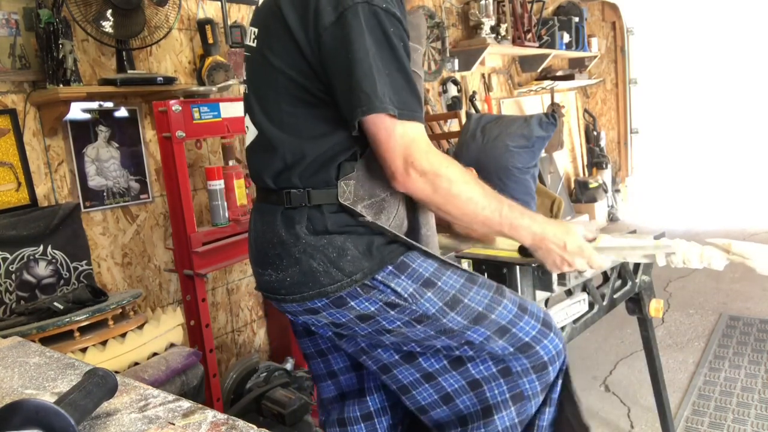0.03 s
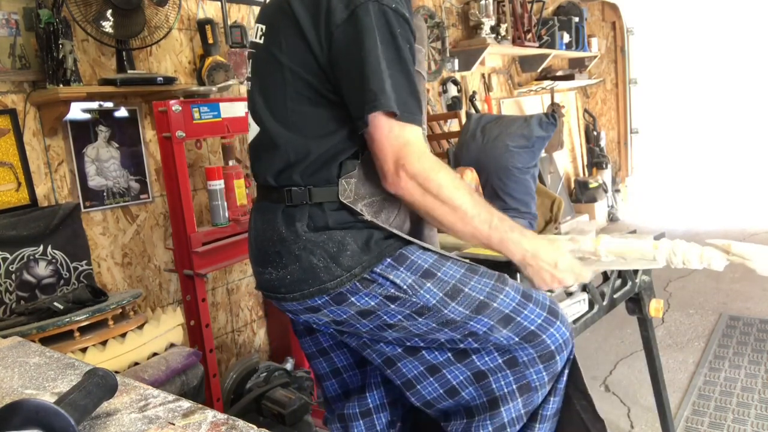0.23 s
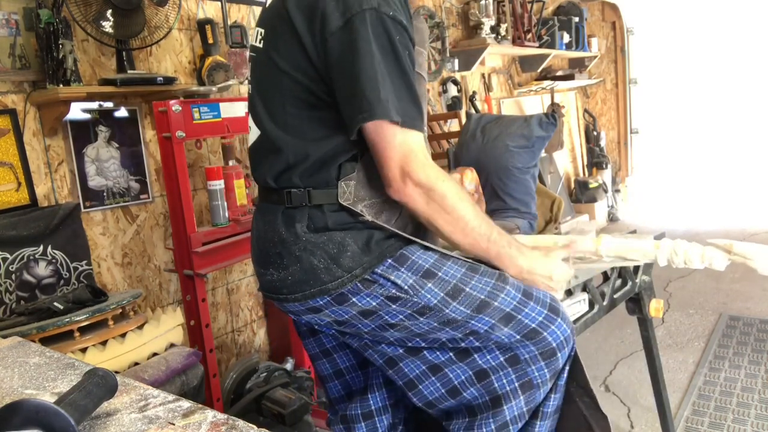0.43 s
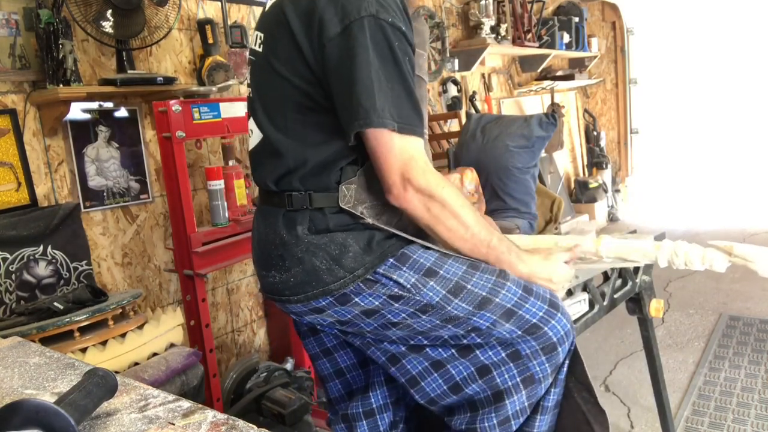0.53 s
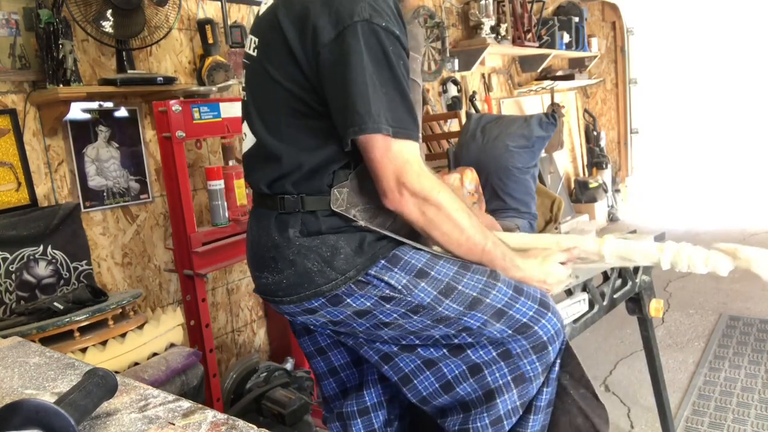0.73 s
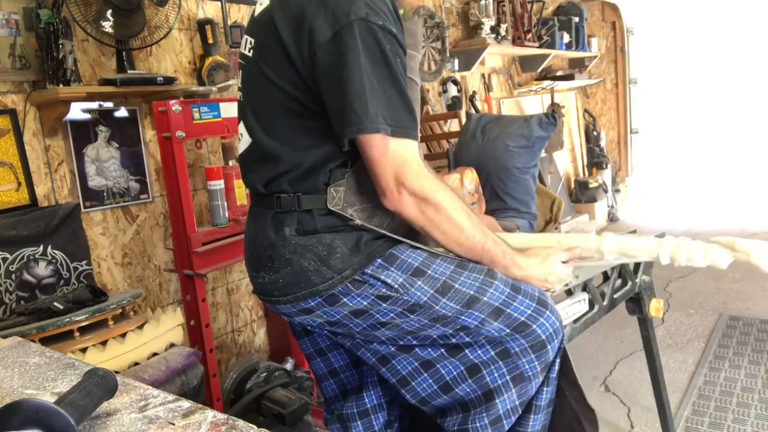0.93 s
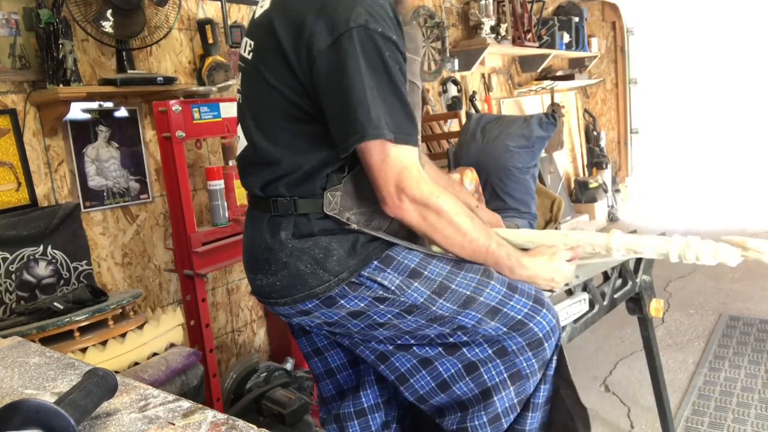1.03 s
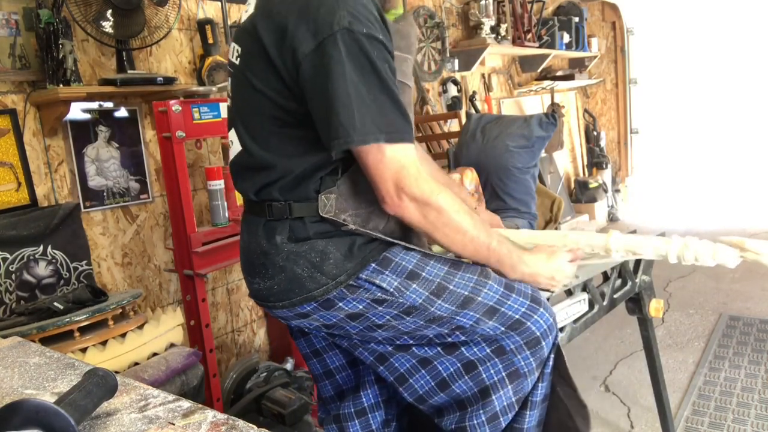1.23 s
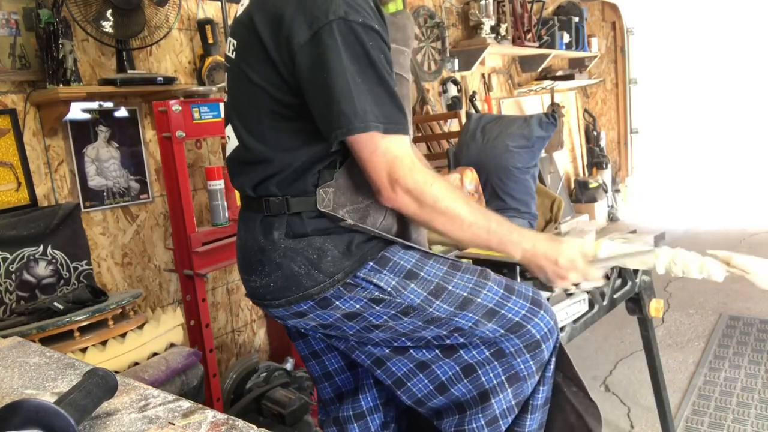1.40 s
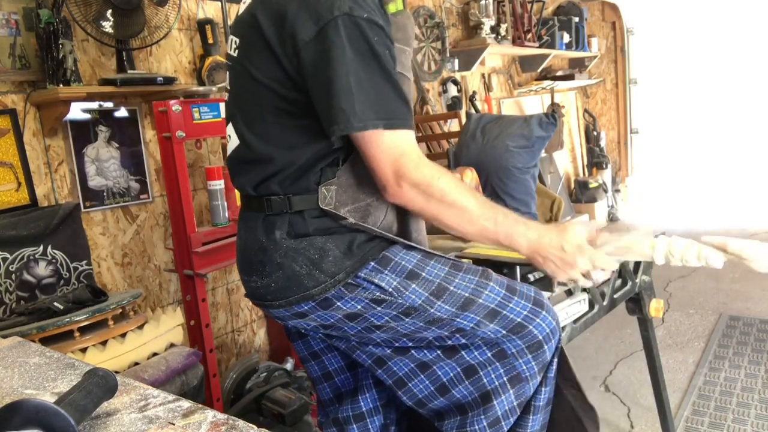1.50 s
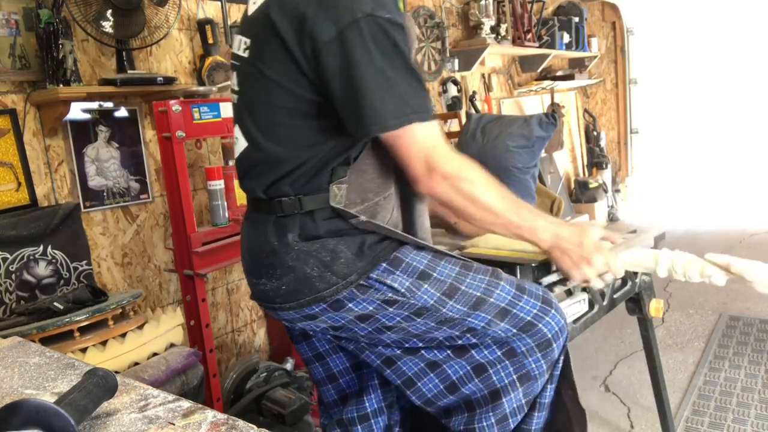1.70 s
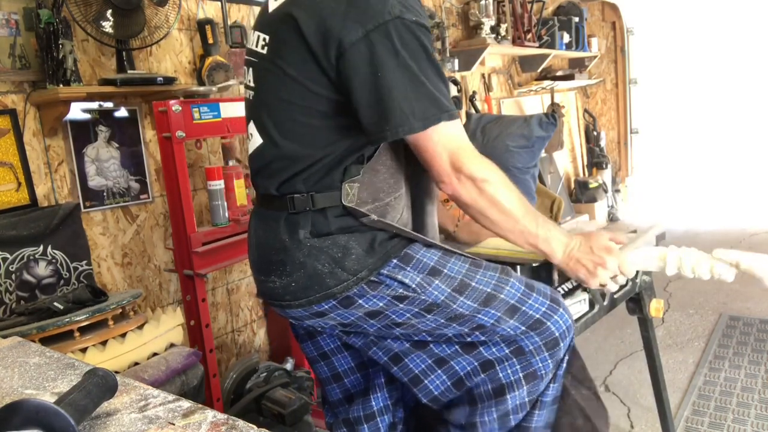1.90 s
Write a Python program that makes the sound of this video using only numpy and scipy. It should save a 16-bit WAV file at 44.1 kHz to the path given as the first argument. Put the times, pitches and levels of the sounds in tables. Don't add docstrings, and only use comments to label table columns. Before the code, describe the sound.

Sharp metallic clack of a clamp closing on wood, then faint clicks, rubbing and low rumble.

```python
import sys
import numpy as np
from scipy import signal
from scipy.fft import rfft, irfft
from scipy.io import wavfile
from scipy.ndimage import uniform_filter1d

SR = 44100
rng = np.random.default_rng(int(sys.argv[2]) if len(sys.argv) > 2 else 0)


def to_wav(sig):
    pcm = np.clip(np.atleast_2d(sig), -1, 1) * 32767
    pcm = np.round(pcm).astype(np.int16)
    wavfile.write(sys.argv[1], SR, pcm.T)


def linear_from_db(decibels):
    return 10 ** (np.asarray(decibels, float) / 20)


N = 85995

# start_s, level_db, pitch_hz, burst_ms, ring_db
SNAPS = [(.2003, -18, 6200, 0.82, -5.5), (.2024, -17, 4260, 2.5, -8), (.2068, -22.5, 4140, 0.66, -4),
         (.2110, -31.5, 1680, 2.54, -2.5), (.2396, -40, 3800, 1.5, 2), (0.2444, -21, 4050, 1.3, -9),
         (.2590, -25, 3940, 1.8, -8), (.2760, -30.5, 3480, 1.25, -10), (.3560, -47, 2160, 3.06, -22),
         (1.0744, -29, 3480, 0.497, -17.5), (1.6750, -48, 4560, 2.4, -10), (1.8213, -43.5, 6130, .6, -3.5)]
# pitch_hz, level_db, t60_s
STEEL_MODES = [(813, -10.5, 0.29), (1343, -8, 0.4), (1600, -1.5, 0.17), (2260, -7, 0.18), (2740, -6, 0.08),
               (3440, -0.5, .07), (3650, -4, 0.072), (3770, -5, 0.1), (3820, -3.5, 0.11), (4290, 2, 0.072),
               (4197, -4, 0.079), (5596, -5.5, 0.056), (6670, -13, 0.11), (7480, 0.5, 0.04)]
# pitch_hz, width_hz, level_db
CHATTER_BANDS = [(1600, 1970, -1.5), (2300, 1100, -4.5), (3600, 1300, -1), (5460, 990, -3.5),
                 (7600, 1500, -6), (12500, 2600, -13.5)]
# start_s, pitch_hz, level_db, t60_s
PIN = (1.8215, 11500, -47, .018)
# start_s, level_db, pitch_hz, contact_ms, thud_db
KNOCKS = [(0.0911, -42, 724, 8, -19), (0.163, -44.5, 1000, 6.4, -3), (.2520, -40, 760, 7.5, -42),
          (.4480, -48.5, 1000, 7.5, -45), (0.5221, -35.5, 760, 5, -14), (.7450, -54.5, 950, 13.3, -25),
          (1.4100, -41, 600, 9, -24), (1.439, -49, 1080, 5.1, 1), (1.5325, -43, 950, 11.7, -13),
          (1.6745, -38, 1160, 1.2, 3), (1.6970, -51, 790, 2.5, 6), (1.748, -45.5, 1350, 7.5, -21),
          (1.7720, -41, 1160, 9.2, -16), (.0020, -47, 603, 7.1, -5.5), (.2800, -38, 812, 16, -28),
          (1.4150, -43, 1150, 14.6, -30)]
# pitch_hz, level_db, t60_s
WOOD_MODES = [(617, -1, 0.21), (705.5, -5.5, 0.13), (812, -3.5, 0.086), (937, -11, 0.05), (1016, -8, .06),
              (1154, -4.5, 0.042), (1256, 2, 0.046), (1690, -2, 0.046), (2650, -12, 0.03),
              (2310, -22, 0.018), (3000, -7, 0.039)]
# pitch_hz, level_db, t60_s
THUD_MODES = [(290, -2, 0.06), (359, 0, 0.092), (489, 0.5, 0.048)]
# start_s, pitch_hz, level_db, rise_ms, t60_s
RINGS = [(.256, 705, -43, 5, 0.18), (.280, 812, -42, 11, .24), (.290, 1690, -49, 6, .12),
         (.331, 1338, -48, 4, .2), (.352, 2256, -50, 4, .08), (.397, 2256, -59, 4, .1),
         (.298, 3400, -50, 4, .1), (.449, 935, -50, 3, .12), (.449, 1270, -52, 3, .07),
         (.523, 1685, -48, 2, 0.053), (.550, 900, -56, 5, 0.11), (.565, 720, -53, 5, .1),
         (.260, 4270, -36, 2, .07), (0.21, 3800, -40, 2, .07), (0.31, 3500, -40, 1.7, 0.055),
         (.288, 4000, -47, 1.5, 0.033), (1.381, 3800, -57.5, 3, 0.093), (1.410, 1004, -47.5, 2, .08),
         (1.412, 1685, -52, 2, 0.078), (1.318, 614, -59, 12, 0.33), (1.4, 1330, -55, 2.7, 0.067),
         (1.0742, 1410, -44, 0.25, 0.015), (1.675, 900, -46, 1.9, 0.061), (.745, 1000, -54, 8, 0.17),
         (1.397, 1300, -50, 3, .05), (.093, 1150, -50, 1.8, 0.075), (.165, 340, -53, 4, .08),
         (1.411, 614, -46, 3, .18), (1.675, 3100, -52, .6, .02), (1.768, 3000, -52, .8, .015),
         (1.770, 4500, -54, .6, .012), (1.774, 1150, -48, 2, .05), (1.535, 2400, -54, 1, .03),
         (1.818, 1300, -53, 3, .06), (1.870, 450, -52, 4, .06), (.2005, 3440, -27, .8, .03),
         (.2005, 5750, -30, .5, .03), (.2025, 2500, -32, 1, .03), (.5228, 614, -36, 1.5, .06)]
# start_s, level_db, pitch_hz, rise_ms, fall_ms
SCUFFS = [(.004, -51, 1500, 4.5, 30), (0.044, -61, 2000, 1.9, 11), (0.09, -54, 2240, 2, 20),
          (0.099, -62, 12500, 16, 16), (0.199, -47, 3000, 5, 4.0), (0.265, -36.5, 3800, 12.6, 27.4),
          (.545, -62, 3470, 14, 25.0), (1.200, -65.5, 4000, 43, 49), (1.385, -63, 3800, 6.9, 12),
          (1.404, -51.5, 2200, 8.5, 12.5), (1.420, -62.5, 6600, 14, 23), (1.420, -70, 13300, 9.6, 20),
          (1.537, -62, 1600, 1.7, 26), (1.570, -64, 2650, 4.6, 13), (1.599, -62, 1360, 4.0, 12.0),
          (1.770, -54.5, 3000, 3.5, 6.7), (1.797, -57.5, 2860, 5.3, 40), (1.835, -60, 2700, 10.0, 25),
          (.228, -41, 2400, 12, 20), (.225, -45, 6800, 10, 20), (.262, -43, 1700, 15, 35),
          (1.758, -56, 1600, 8, 15), (1.793, -56, 900, 4, 12), (1.418, -57, 2400, 5, 20),
          (1.830, -71, 13500, 36, 21)]
# time_s, level_db
SLIDE_PRESSURE = [(0, -62.5), (.19, -62.5), (.36, -61.5), (.5, -65), (.63, -72.5), (.72, -64.5), (.82, -59),
                  (.93, -62.5), (1.02, -69), (1.12, -62), (1.27, -77.5), (1.37, -62), (1.5, -66.5),
                  (1.64, -79.5), (1.75, -64.5), (1.86, -63.5), (1.95, -70)]
# pitch_hz, width_hz, level_db
SLIDE_BANDS = [(874, 900, 3), (1500, 940, -2.5), (2497, 120, -2), (2900, 480, 1.5), (3800, 970, 2),
               (4490, 104, -5), (6320, 1600, -4), (11500, 4500, -10.5)]
# pitch_hz, t60_s, level_db
ROOM_DECAY = [(264, 0.62, -2.5), (480, 0.53, -6.5), (1000, 0.33, -1), (2000, 0.3, 0), (4000, 0.19, -4),
              (8540, 0.24, -4.5), (14400, 0.19, 3)]
# pitch_hz, width_hz, level_db
RUMBLE_MODES = [(56.4, 23, -0.5), (71, 18.7, -2), (85.3, 18.3, -0.5), (100.3, 8.5, 1.5), (121.6, 25.5, -5),
                (169, 30, -9)]
# time_s, level_db
RUMBLE_SWELL = [(0.0, -54), (0.064, -48), (0.19, -56), (0.21, -47.5), (0.282, -58.5), (0.304, -51.5),
                (0.58, -46.5), (0.624, -57), (0.65, -47), (0.912, -52.5), (0.938, -43.5), (1.036, -56.5),
                (1.08, -46), (1.238, -50.5), (1.466, -45), (1.492, -56), (1.52, -46), (1.95, -52)]
# pitch_hz, level_db (per Hz)
HISS_SPECTRUM = [(150, -10.5), (231, -4.5), (700, -14.5), (1500, -15.5), (4500, -30), (6000, -26),
                 (9000, -33), (14000, -34)]
# pitch_hz, width_hz, depth (0-1)
MIC_DIP = (10300, 420, 0.37)

HIT_SPREAD_DB = 1.5


def unit(x):
    return x / np.sqrt(np.mean(x ** 2))


def band(x, hz, width):
    return signal.lfilter(*signal.iirpeak(hz, hz / width, SR), x)


def steep(x, hz, width):
    return band(band(x, hz, width), hz, width)


def decay(t, t60):
    return 1000. ** (-t / t60)


def add(out, x, s):
    i = int(s * SR)
    x = x[:N - i]
    out[i:i + len(x)] += x


def curve(table):
    time_s, level_db = np.transpose(table)
    return np.interp(np.arange(N) / SR, time_s, level_db)


def ring(push, modes, colour):
    hz, db, t60 = np.array(modes).T[:, :, None]
    t = np.arange(int(.3 * SR)) / SR
    reach = np.abs(np.exp(-2j * np.pi * hz * t[:len(push)]) @ push)[:, None]
    reach = reach / np.sqrt(np.sum(push ** 2))
    gain = linear_from_db(db + colour[:, None]) / (0.075 + reach)
    body = gain * np.sin(2 * np.pi * hz * t) * decay(t, t60)
    return signal.fftconvolve(push, body.sum(axis=0))


def near(modes, hz, db_per_octave):
    return -db_per_octave * np.abs(np.log2(np.array(modes)[:, 0] / hz))


def spread(modes):
    return rng.standard_normal(len(modes))


def grit(count):
    caught = rng.random(count) < 1100 / SR
    size = linear_from_db(2.5 * np.minimum(rng.exponential(size=count), np.e))
    grains = caught * size * rng.standard_normal(count)
    return .5 * unit(grains) + rng.standard_normal(count)


def snaps():
    out, t, long = np.zeros(N), np.arange(600) / SR, np.arange(4000) / SR
    for s, db, hz, ms, ring_db in SNAPS:
        shape = t / (ms / 1000) * np.exp(1 - t / (ms / 3000)) * 3
        noise = steep(rng.standard_normal(600), hz, 1.01 * hz)
        burst = shape * (np.sin(2 * np.pi * hz * t) + 0.93 * noise)
        add(out, linear_from_db(db) * band(burst, hz, 3.2 * hz), s - ms / 2000)

        click = np.sign(rng.standard_normal(1))
        colour = near(STEEL_MODES, hz, 4.0) + HIT_SPREAD_DB * spread(STEEL_MODES)
        add(out, linear_from_db(db + ring_db - 10) * ring(click, STEEL_MODES, colour), s)

        shake = rng.standard_normal(4000) * np.exp(-long / 0.0133)
        chatter = sum(linear_from_db(g) * steep(shake, f, w) for f, w, g in CHATTER_BANDS)
        add(out, linear_from_db(db + ring_db) * chatter, s)
    return out


def pin():
    out, t = np.zeros(N), np.arange(4000) / SR
    s, hz, db, t60 = PIN
    tone = np.sin(2 * np.pi * hz * t) + 0.33 * np.sin(2.03 * np.pi * hz * t)
    add(out, linear_from_db(db) * tone * decay(t, t60), s)
    return out


def knocks():
    out, t = np.zeros(N), np.arange(2500) / SR

    def peak(x):
        return x / np.max(np.abs(x))

    for s, db, hz, ms, thud_db in KNOCKS:
        shape = np.exp(-t / (ms / 1000)) * np.minimum(t / (ms / 3000), 1)
        push = band(rng.standard_normal(2500), hz, 1.48 * hz) * shape
        colour = near(WOOD_MODES, hz, 10.0) + HIT_SPREAD_DB * spread(WOOD_MODES)
        add(out, linear_from_db(db) * peak(ring(push, WOOD_MODES, colour)), s)
        thud = ring(push, THUD_MODES, 2.0 * spread(THUD_MODES))
        add(out, linear_from_db(db + thud_db) * peak(thud), s)
        add(out, linear_from_db(db - 9.5) * peak(steep(push, hz, 0.51 * hz)), s)
    return out


def rings():
    out, t = np.zeros(N), np.arange(int(.3 * SR)) / SR
    pair_hz, pair_share = 27, .35
    for s, hz, db, rise_ms, t60 in RINGS:
        swell = 1 - np.exp(-(t / (rise_ms / 1000)) ** 2)
        pair = np.sin(2 * np.pi * hz * t) + pair_share * np.sin(2 * np.pi * (hz + pair_hz) * t)
        add(out, linear_from_db(db) * swell * decay(t, t60) * pair, s)
    return out


def scuffs():
    out, t = np.zeros(N), np.arange(N) / SR
    rub = grit(N)
    for s, db, hz, rise_ms, fall_ms in SCUFFS:
        part = slice(max(int((s - .1) * SR), 0), int((s + 0.14) * SR))
        d = t[part] - s
        rise = np.exp(-(d / (rise_ms / 1000)) ** 2)
        fall = np.exp(-np.abs(d) / (fall_ms / 1000))
        shape = np.where(d < 0, rise, fall)
        width = 0.79 * min(hz, 5500)
        coloured = band(band(rub[part], hz, width), hz, 1.6 * width)
        out[part] += linear_from_db(db) * shape * unit(coloured)
    return out


def slide():
    rub = grit(N)
    coloured = sum(linear_from_db(db) * unit(steep(rub, hz, w)) for hz, w, db in SLIDE_BANDS)
    return unit(coloured) * linear_from_db(curve(SLIDE_PRESSURE) + 1)


def garage(x):
    t = np.arange(int(.6 * SR)) / SR
    tail = np.zeros(len(t))
    for hz, t60, db in ROOM_DECAY:
        octave = unit(band(rng.standard_normal(len(t)), hz, 0.54 * hz))
        tail += linear_from_db(db) * np.sqrt(hz) * octave * decay(t, t60)
    tail = tail * np.clip(t / 0.0032 - .5, 0, 1)
    tail = tail / np.sqrt(np.sum(tail ** 2))
    return x + linear_from_db(-5) * signal.fftconvolve(x, tail)[:N]


def rumble():
    low = np.zeros(N)
    for hz, w, db in RUMBLE_MODES:
        mode = steep(rng.standard_normal(2 * N), hz, w)[N:]
        low += linear_from_db(db) * unit(mode)
    slow = np.sqrt(uniform_filter1d(uniform_filter1d(low ** 2, 3000), 3000))
    return unit(low / slow ** 0.31) * linear_from_db(curve(RUMBLE_SWELL))


def hiss():
    f = np.maximum(np.arange(N // 2 + 1) * SR / N, 1)
    hz, level_db = np.transpose(HISS_SPECTRUM)
    db = np.interp(np.log(f), np.log(hz), level_db)
    db = db - 20 * np.log10(1 + (90 / f) ** 2)
    return unit(irfft(rfft(rng.standard_normal(N)) * linear_from_db(db), N)) * linear_from_db(-65)


def scene():
    vise = snaps() + pin() + knocks() + scuffs() + rings()
    return (garage(vise) + slide() + rumble() + hiss())[None]


def band_limit(x):
    return signal.sosfilt(signal.butter(12, 16600, fs=SR, output="sos"), x)


def record(dry):
    hz, width, depth = MIC_DIP
    dipped = dry - depth * band(dry, hz, width)
    top_edge = signal.ellip(8, .2, 60, 15850, fs=SR, output="sos")
    mix = signal.sosfilt(top_edge, dipped)
    return band_limit(mix)


dry = scene()
out = record(dry)
to_wav(out)
```